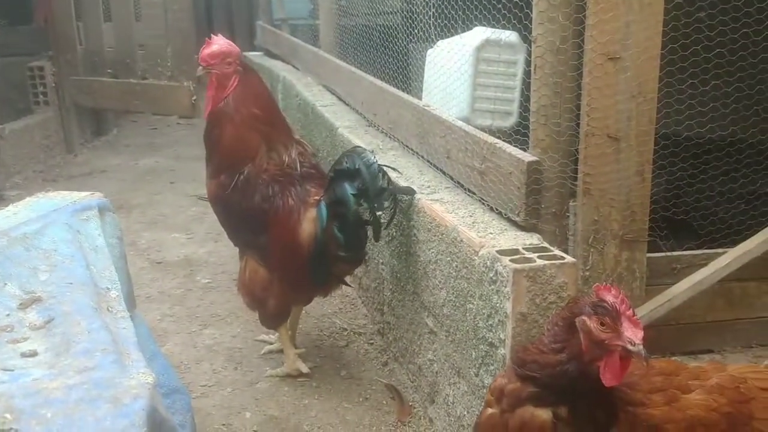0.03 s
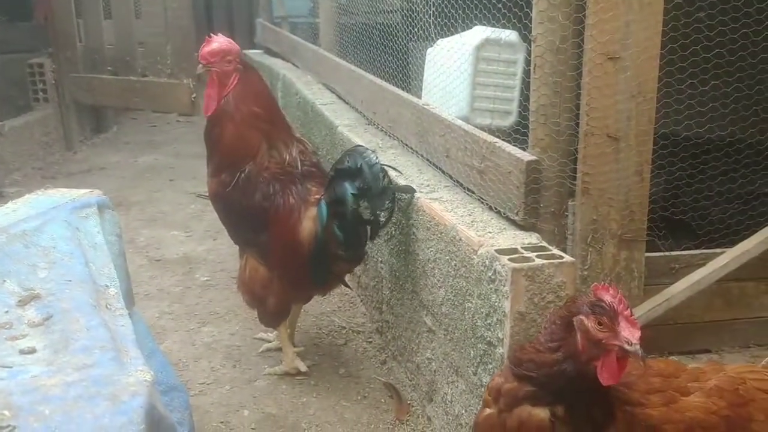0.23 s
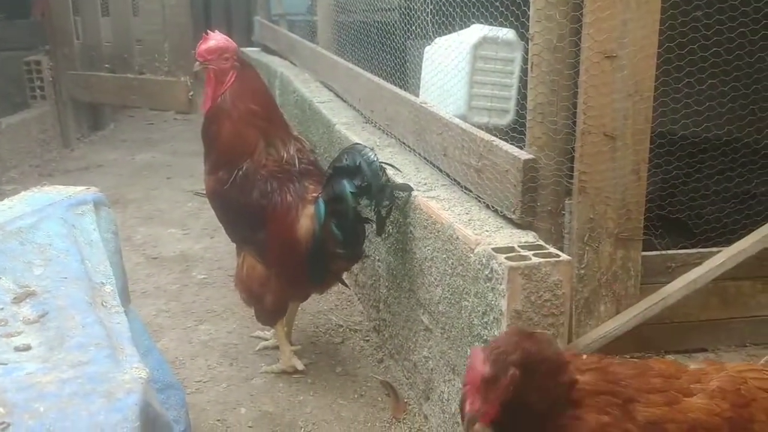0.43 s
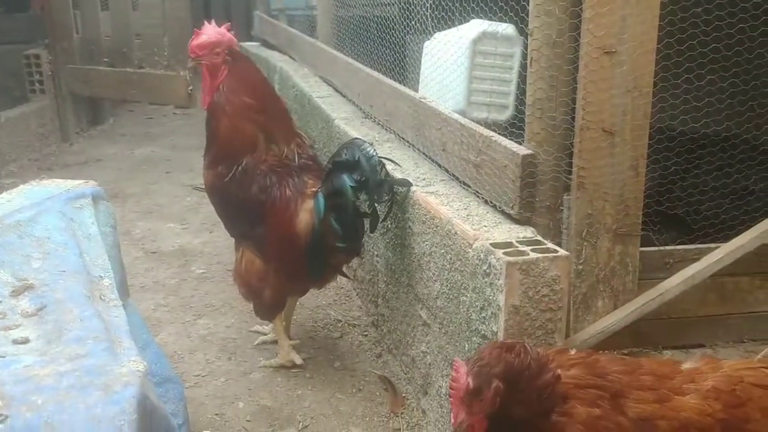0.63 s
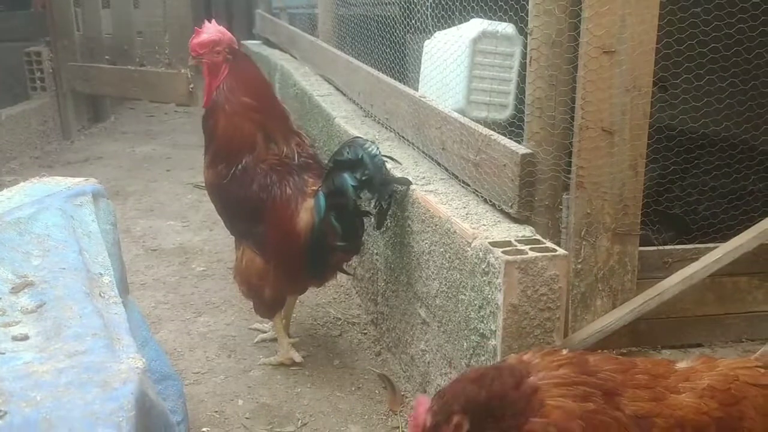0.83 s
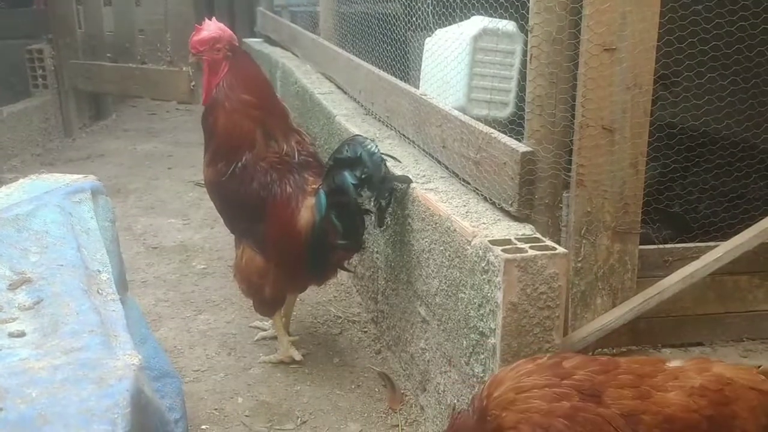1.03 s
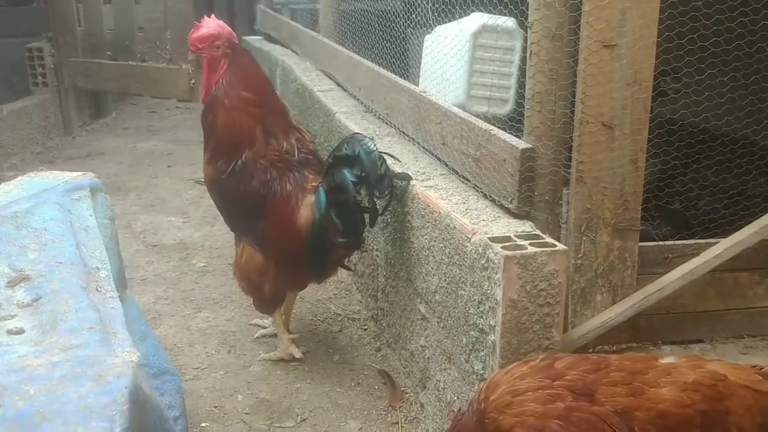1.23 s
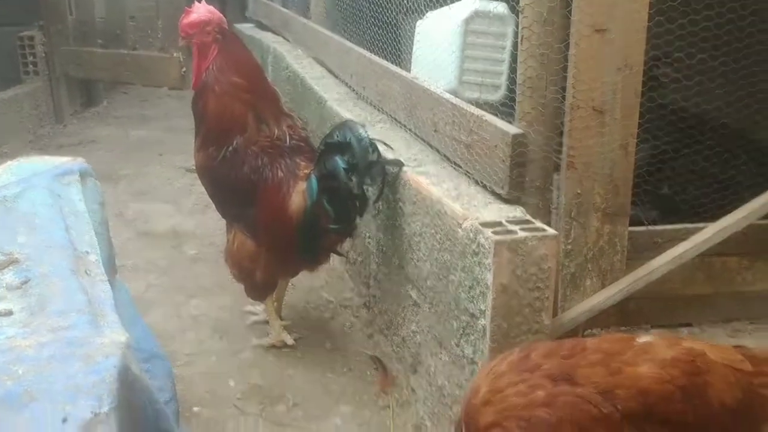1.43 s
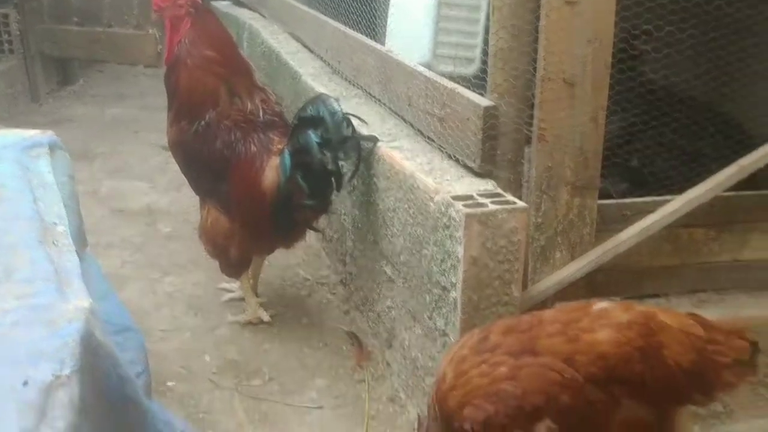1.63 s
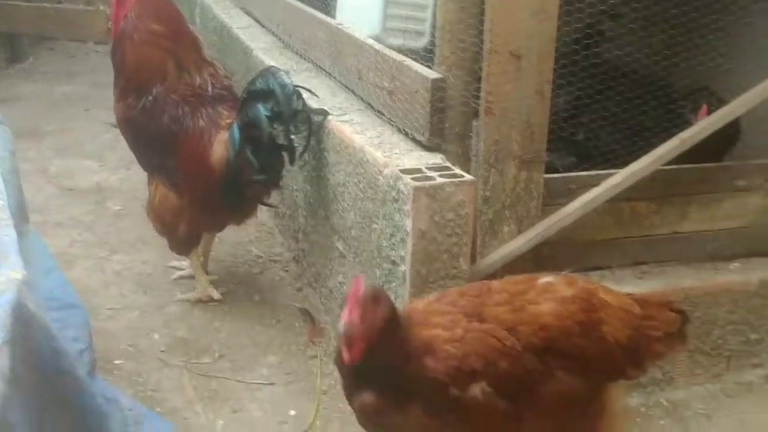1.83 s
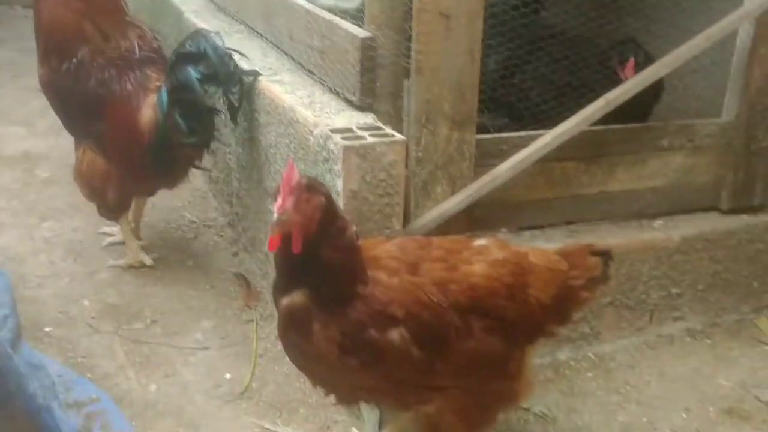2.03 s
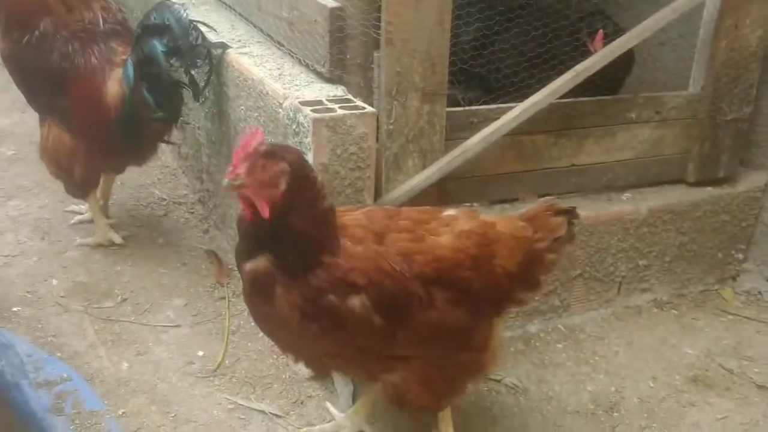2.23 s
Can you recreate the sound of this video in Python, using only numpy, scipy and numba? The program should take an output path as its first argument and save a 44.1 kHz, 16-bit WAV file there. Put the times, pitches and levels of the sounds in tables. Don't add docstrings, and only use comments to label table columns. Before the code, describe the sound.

Close rooster crow, rough then clear and falling, ending in hoarse gasps, with soft hen clucks

```python
import sys
import numpy as np
from scipy import signal
from scipy.fft import rfft, irfft
from scipy.io import wavfile
from scipy.ndimage import uniform_filter1d
from numba import njit

SR = 44100
rng = np.random.default_rng(int(sys.argv[2]) if len(sys.argv) > 2 else 0)


def materialize(psi):
    bounded = np.clip(np.atleast_2d(psi).T, -1, 1)
    quanta = np.round(bounded * 32767).astype(np.int16)
    wavfile.write(sys.argv[1], SR, quanta)


def how_loud(loudness_db):
    steps = np.asarray(loudness_db, float) / 20
    return 10 ** steps


N = 101165


def cols(table, t):
    a = np.array(table, float)
    return [np.interp(t, a[:, 0], c) for c in a[:, 1:].T]


def level(x, db):
    return x * how_loud(db) / np.sqrt(np.mean(x ** 2))


def noise():
    return rng.standard_normal(N)


@njit
def svf(x, hz, width):
    y, b, l = np.empty(len(x)), 0., 0.
    for i in range(len(x)):
        g, k = np.tan(np.pi * hz[i] / SR), width / hz[i]
        v = (b + g * (x[i] - l)) / (1 + g * (g + k))
        b, l, y[i] = 2 * v - b, l + 2 * g * v, k * v
    return y


def band(x, hz, width_hz):
    return svf(x, hz + np.zeros(N), 1. * width_hz)


def steep(x, hz, width_hz):
    return band(band(x, hz, width_hz), hz, width_hz)


def walk(rate):
    size = int(SR / rate)
    w = uniform_filter1d(uniform_filter1d(noise(), size), size)
    return w / w.std()


def burst(t, start, length):
    u = np.clip((t - start) / length, 0, 1)
    return np.sin(np.pi * u ** 0.76) ** 2


def far_birds():
    chatter_hz, width_hz, chatter_db = 2585, 770, -50.5
    flicker = how_loud(2.5 * walk(25))
    return level(flicker * steep(noise(), chatter_hz, width_hz), chatter_db)


# (frequency [Hz], level [dB])
BUSTLE = [(200, -7), (500, -6), (900, 0), (1900, -23), (2700, -5.5), (4000, -21.5), (8000, -32),
          (15000, -49)]


def yard():
    bustle_db, duck_db, duck_ends_s, release_s = -35.5, -5, 1.517, 0.17
    f, db = np.array(BUSTLE).T
    out = 0
    for hz in 200 * 2 ** np.arange(0, 6.3, .5):
        gain_db = np.interp(np.log(hz), np.log(f), db) + 10 * np.log10(hz)
        gain_db = gain_db + 2.6 * walk(15)
        out = out + how_loud(gain_db) * level(steep(noise(), hz, hz / 2), 0)
    duck = np.clip((duck_ends_s - np.arange(N) / SR) / release_s, 0, 1)
    return (level(out, bustle_db) + far_birds()) * how_loud(duck_db * duck)


# (time [s], level [dB])
GUSTS = [(0.0, -45), (0.05, -60.5), (0.78, -68.5), (0.81, -45), (1.01, -58.5), (1.03, -45.5), (1.31, -49.5),
         (1.34, -43), (1.38, -46.5), (1.49, -39.5), (1.59, -41), (1.64, -37), (1.71, -45), (2.06, -45.5),
         (2.12, -43), (2.17, -46.5), (2.23, -33.5), (2.29, -54)]


def puff():
    hz, width_hz = 108, 124
    return level(band(steep(noise(), hz, width_hz * 2), hz, width_hz), 0)


def wind(t):
    wind_db = 12
    gust = how_loud(cols(GUSTS, t)[0] + wind_db + 2 * walk(35))
    opposite = puff() * np.array([[1], [-1]])
    own = np.array([puff(), puff()])
    return gust * (opposite + how_loud(-7) * own)


# (time [s], length [s], level [dB], centre [Hz])
FOOT_SCUFFS = [
    (1.215, .07, -39, 3300),
    (1.54, .045, -41, 2700),
    (1.84, .08, -43, 3500),
]


def scuffs(t):
    grit = noise() * how_loud(2 * walk(900))
    return sum(burst(t, s, n) * level(steep(grit, hz, 1500), db) for s, n, db, hz in FOOT_SCUFFS)


# (time [s], length [s], pitch [Hz], level [dB], overtone [dB])
HEN_CALLS = [
    (.2, .03, 1062, -16, -30),
    (2.124, .02, 470, -25, -20),
    (2.14, .025, 480, -16, -20),
    (2.03, .12, 349, -46, 7),
    (2.14, .14, 765, -43, 0),
]


def clucks(t):
    out = 0
    for s, n, hz, db, over_db in HEN_CALLS:
        pitch_hz = hz * (1 + 0.00954 * walk(40))
        p = 2 * np.pi * np.cumsum(pitch_hz) / SR
        third = how_loud(over_db) * np.sin(3 * p) * (hz < 700)
        tone = np.sin(p) + how_loud(over_db) * (np.sin(2 * p) + third)
        shape = burst(t, s, n) ** min(1, .03 / n)
        out = out + how_loud(db) * shape * tone
    return out


# (time [s], length [s], level [dB])
GASPS = [
    (1.812, .08, -24),
    (1.921, .025, -24),
    (1.95, .04, -27),
    (1.985, .075, -25),
]


def rasps(t):
    air = noise() * how_loud(4 * np.tanh(walk(200)))
    air = level(steep(air, 660, 350) + how_loud(-5) * steep(air, 1120, 700), 0)
    return air * sum(how_loud(db) * burst(t, s, n) for s, n, db in GASPS)


def membrane(t, hz, db, rough, swap):
    jitter, drift, shimmer_db, flutter_db = .22, .17, 5.0, 1.5
    phase = np.cumsum(hz) / SR
    k = np.arange(1, int(phase[-1]))
    at = np.interp(k, phase, np.arange(N)).astype(int)
    c = rng.standard_normal((2000, 3))[:len(k)].T
    r = np.clip(rough[at], 0, 1)
    cycle = k + jitter * r * c[0] + np.cumsum(drift * r * c[1])
    when = np.interp(cycle, phase, np.arange(N))
    alternate = 1 + swap[at] * (-1.) ** k
    size = how_loud(db[at] + shimmer_db * r * c[2]) * alternate / np.sqrt(hz[at] / 500)
    taps = when.astype(int)[:, None] + np.arange(-7, 9)
    d = taps - when[:, None]
    pulse = np.sinc(d) * np.cos(np.pi * d / 16) ** 2
    out = np.zeros(N)
    np.add.at(out, np.clip(taps, 0, N - 1), size[:, None] * pulse)
    return out * how_loud(flutter_db * rough * walk(70))


# (time [s], pitch [Hz], level [dB], roughness [0-1])
UPPER_MEMBRANE = [
    (0, 756, -1, 0.55),
    (.2, 760.8, 0.5, 0.48),
    (.41, 740, 0, .6),
    (.415, 563.3, -4.5, 0.77),
    (.75, 550.7, 0, .4),
    (.9, 544.4, -1, 0.4),
    (1.25, 532.7, -8.5, .5),
    (1.5, 545.6, -5.5, .6),
    (1.6, 562, -33, 0.5),
]
# (time [s], pitch [Hz], level [dB], roughness [0-1], strong-weak alternation [0-1])
LOWER_MEMBRANE = [(.4, 456, -32, .8, 0.2), (.6, 454.7, -18.5, 0.63, 0.4), (1.0, 461.1, -4, .4, 0),
                  (1.25, 474, -1, .15, .1), (1.48, 478, -1, .18, .25), (1.505, 471.7, 1, 0, 1),
                  (1.6, 467.6, -1.5, 0.01, 0.69), (1.626, 449.4, -1.5, 0, 0.05), (1.7, 442.7, -5, .01, 0),
                  (1.75, 417, -4, 0.05, 0), (1.815, 398, 0, 0, 0), (1.83, 394, -14, 0.42, 0),
                  (1.86, 372.3, -6, 0, .3), (1.88, 380, -65.5, 0.1, 0)]


def syrinx(t):
    hz, db, rough = cols(UPPER_MEMBRANE, t)
    return membrane(t, hz, db, rough, 0 * t) + membrane(t, *cols(LOWER_MEMBRANE, t)), rough


def patch(t, rough):
    patchy_db, patchy_per_s, ends_s = 8, 75, 1.5
    hoarse = rough * np.clip((ends_s - t) * 20, 0, 1)
    return how_loud(patchy_db * hoarse * np.tanh(walk(patchy_per_s)))


THROAT_WIDTHS = [87, 95, 131]


def low_throat(src, t, rough, f1, f2, f3, db2, db3):
    linger_hz, linger_db, linger_ends_s, body_db = 740, -3, 0.69, -13
    w1, w2, w3 = THROAT_WIDTHS
    low = patch(t, rough) * band(src, f1, w1)
    low = low - how_loud(db2) * patch(t, rough) * band(src, f2, w2)
    low = low + how_loud(db3) * patch(t, rough) * band(src, f3, w3)
    fade = np.clip((linger_ends_s - t) * 2, 0, 1)
    low = low + how_loud(linger_db) * patch(t, rough) * fade * band(src, linger_hz, 120)
    low = low + how_loud(body_db) * band(src, 1300, 600)
    return signal.sosfilt(signal.butter(6, [410, 1720], "band", fs=SR, output="sos"), low)


# (frequency [Hz], width [Hz], level [dB])
HIGH_RESONANCES = [(1886, 120, -15), (2160, 170, -38.5), (2550, 133, -18.5), (3840, 150, -24.5),
                   (5610, 710, -43), (6296, 960, -39.5), (8000, 300, -47.5), (10500, 1100, -53.5)]


def high_throat(src, t, rough):
    return sum((-1) ** k * how_loud(db) * patch(t, rough) * steep(src, hz, w * 2)
               for k, (hz, w, db) in enumerate(HIGH_RESONANCES))


# (multiple of the beak resonance [ratio], level [dB])
BEAK_RESONANCES = [(.85, -6), (1, 0), (1.58, -19), (1.95, -23), (2.3, -26)]


def open_beak(src, t, beak_hz):
    opens_s, width_hz = 1.58, 600
    return sum(how_loud(db) * np.clip((t - opens_s) * 20 + (m == 1) * 99, 0, 1) * steep(src, beak_hz * m, width_hz)
               for m, db in BEAK_RESONANCES)


# (time [s], first [Hz], second [Hz], third low resonance [Hz], beak resonance [Hz],
# second level [dB], third level [dB], upper resonances level [dB], beak level [dB])
POSTURE = [(0, 726, 1040, 1607, 4800, 3, 3.5, 12, -36), (.41, 697, 1068, 1513, 4450, -0.5, -1, 5, -35.5),
           (.425, 605, 958, 1650, 4750, 4.5, -3, 6, -40), (.9, 539, 958, 1550, 4550, 3.5, -1.5, -2, -33.5),
           (1.1, 538, 863, 1332, 4730, 3, 1, -1, -35), (1.45, 540, 943, 1450, 5120, -2, -3.5, -13.5, -29.5),
           (1.55, 508, 1004, 1167, 4740, 3, 0, -27.5, -25.5),
           (1.64, 432, 935, 1510, 4785, 6.5, -8, -14.5, -13), (1.72, 432, 850, 1390, 4700, 0, -5, -13, -20),
           (1.76, 464, 897, 1285, 4600, -2, 4, -3, -35),
           (1.81, 454, 898, 1530, 4310, -3.5, 0.5, -21, -35.5)]


def rooster(t):
    crow_db = -17.5
    src, rough = syrinx(t)
    f1, f2, f3, beak_hz, db2, db3, top_db, beak_db = cols(POSTURE, t)
    low = low_throat(src, t, rough, f1, f2, f3, db2, db3)
    top = how_loud(top_db) * high_throat(src, t, rough) + how_loud(beak_db) * open_beak(src, t, beak_hz)
    return level(low + top, crow_db) + rasps(t)


def walls(near, t):
    t60_s, walls_db, first_echo_s = .14, -11, .004
    t = t[:SR // 2]
    tail = rng.standard_normal((2, SR // 2)) * how_loud(-60 * t / t60_s) * (t > first_echo_s)
    tail = tail / np.sqrt((tail ** 2).sum(1))[:, None]
    return how_loud(walls_db) * signal.fftconvolve(near[None], tail, axes=1)[:, :N]


# (frequency [Hz], right port's lead [radians], left minus right [dB])
PORT_PAIR = [(200, -3.1, 0), (370, .2, -2), (550, .1, -7), (800, .2, -5), (1150, .1, -2), (1500, 1.1, 1),
             (1950, 3.1, 1)]


def ports(x):
    comb_hz, stair = 2080, 0.14
    f = np.fft.rfftfreq(N, 1 / SR)
    hz, rad, db = np.array(PORT_PAIR).T
    lead = np.interp(f, hz, rad) + 2 * np.pi * np.maximum(f - hz[-1], 0) / comb_hz
    lead = lead - stair * np.sin(2 * lead) * (f > hz[-1])
    tilt_db = np.interp(f, np.r_[hz, 2500], np.r_[db, 0])
    spectrum = rfft(x)
    return np.array([irfft(spectrum * how_loud(s * tilt_db / 2) * np.exp(-.5j * s * lead), N) for s in (1, -1)])


def scene():
    t = np.arange(N) / SR
    near = rooster(t) + clucks(t) + scuffs(t)
    around = how_loud(-12) * np.array([yard(), yard()])
    return ports(near + yard()) + walls(near, t) + around + wind(t)


def low_pass(x):
    return signal.sosfilt(signal.butter(12, 15430, fs=SR, output="sos"), x)


def record(dry):
    ceiling = 1.3
    return low_pass(ceiling * np.tanh(dry / ceiling))


dry = scene()
out = record(dry)
materialize(out)
```